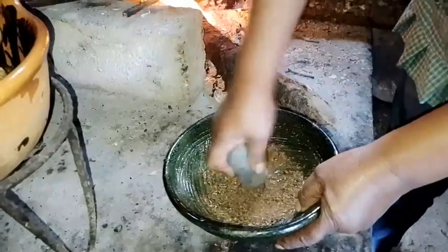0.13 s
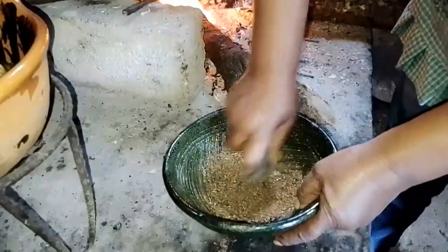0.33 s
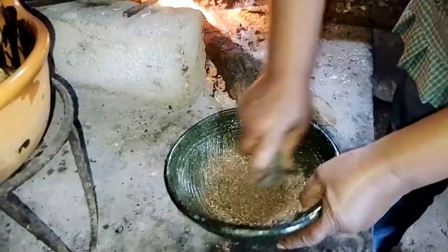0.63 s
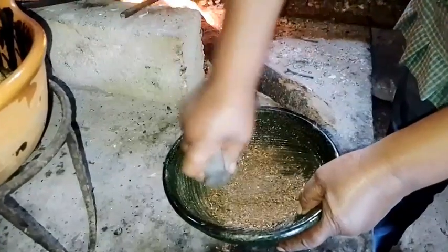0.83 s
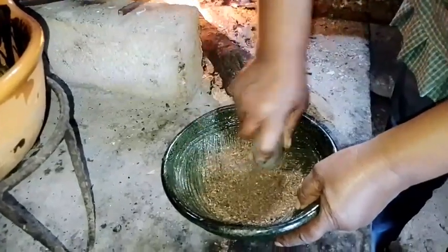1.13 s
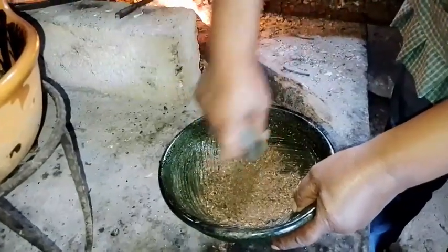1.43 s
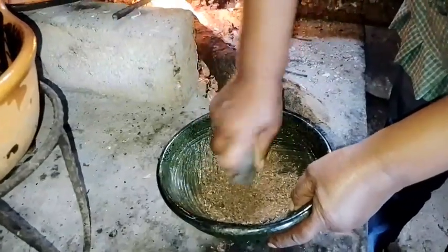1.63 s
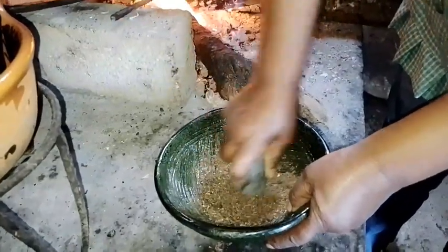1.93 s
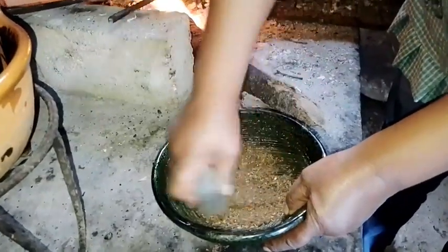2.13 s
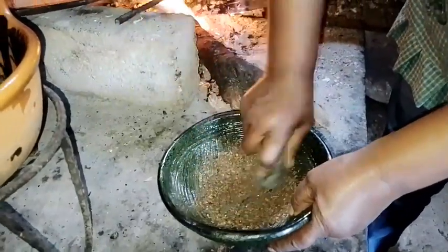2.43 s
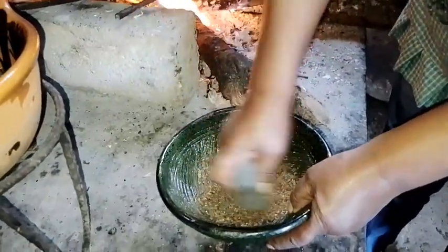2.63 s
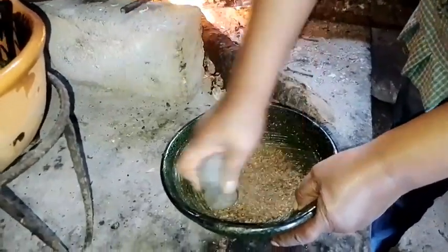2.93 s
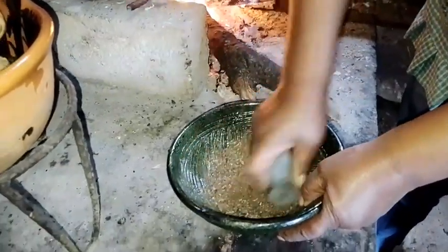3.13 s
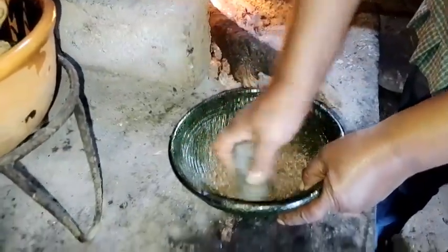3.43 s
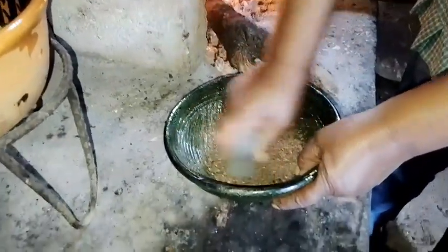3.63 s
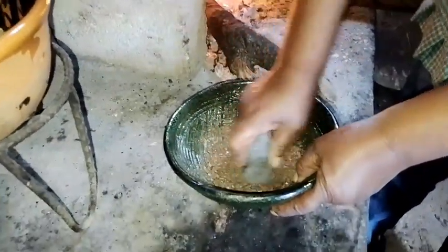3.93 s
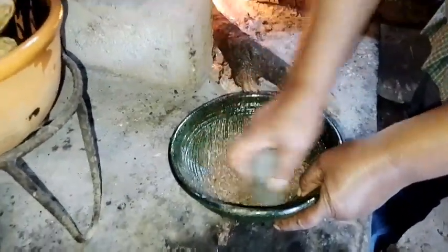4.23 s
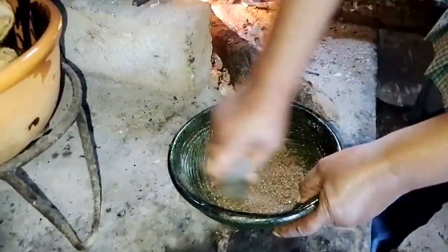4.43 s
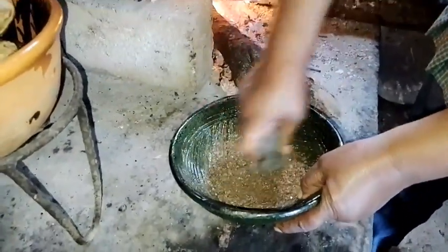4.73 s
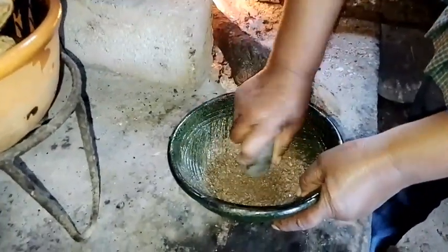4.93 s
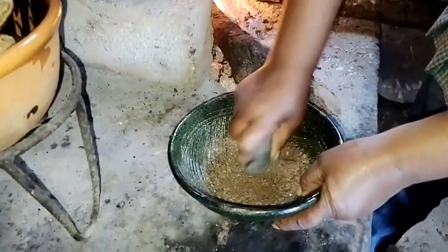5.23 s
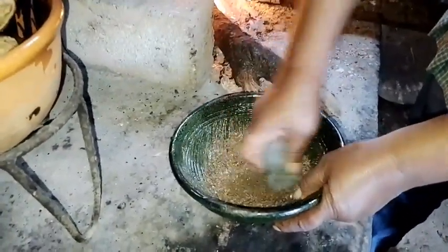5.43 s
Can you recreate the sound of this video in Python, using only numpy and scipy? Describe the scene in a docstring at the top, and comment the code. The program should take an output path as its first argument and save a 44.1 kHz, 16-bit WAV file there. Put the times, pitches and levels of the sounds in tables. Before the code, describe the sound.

A stone pestle grinds dry, gritty seasoning in a hand-held clay bowl with quick uneven scraping strokes, tiny seed cracks and occasional dull knocks.

```python
"""In a small kitchen, a stone pestle grinds dry seasoning in a hand-held clay bowl.
Seven or eight pushes a second shape a random stream of breaking grains: filtered noise that crunches
in the treble and excites the resonances of the bowl's body and wall. Seeds crack as short noise bursts
with a ping, and the pestle now and then knocks on the clay as a band-limited push with a skid.
Feedback delays give the kitchen's faint answer; shaped noise gives its very faint steady hush."""
import sys
import numpy as np
from scipy import signal
from scipy.fft import rfft, irfft
from scipy.io import wavfile
from scipy.ndimage import uniform_filter1d

SR = 44100
rng = np.random.default_rng(int(sys.argv[2]) if len(sys.argv) > 2 else 0)


def store_pcm(level_fs):
    """Save levels as 16-bit WAV."""
    pcm = np.round(np.clip(level_fs, -1, 1) * 32767).astype(np.int16)
    wavfile.write(sys.argv[1], SR, np.atleast_2d(pcm).T)


N = 246078  # length [samples]


def from_db(db):
    """Logarithmic level: decibels become an amplitude gain."""
    return 10 ** (np.asarray(db) / 20)


def rms_one(x):
    """Power normalization: scale a signal to unit mean square."""
    return x / np.sqrt(np.mean(x ** 2) + 1e-20)


def cut(x, hz, kind, order):
    """Causal filtering: a Butterworth response, maximally flat in its passband."""
    return signal.sosfilt(signal.butter(order, hz, kind, fs=SR, output="sos"), x)


def tilt(x, hz, low_db, high_db):
    """Zero-phase band splitting: separate gains below and above a frequency."""
    low = signal.sosfiltfilt(signal.butter(3, hz, fs=SR, output="sos"), x)
    return from_db(low_db) * low + from_db(high_db) * (x - low)


def die_away(x, seconds):
    """Exponential relaxation: every click leaves a tail of its own height."""
    return signal.lfilter([1], [1, -np.exp(-1 / (seconds * SR))], x + 1e-18)


def add(out, start_s, sound):
    """Linear superposition: mix a short sound in at its start time."""
    at = int(start_s * SR)
    out[..., at:at + sound.shape[-1]] += sound[..., :N - at]


def stereo_noise(alike):
    """Interchannel correlation: white noise whose power is partly shared by the two sides."""
    shared = rng.standard_normal(N)
    separate = rng.standard_normal((2, N))
    return np.sqrt(alike) * shared + np.sqrt(1 - alike) * separate


def drift(rate):
    """Low-pass random process: slow chance of unit spread, changing about rate times a second."""
    step = 40  # samples between computed points
    r = np.exp(-2 * np.pi * rate * step / SR)
    chance = rng.standard_normal(N // step + 2002)
    slow = signal.lfilter([1], [1, -2 * r, r * r], chance)[2000:]  # settled part
    return np.interp(np.arange(N) / step, np.arange(len(slow)), rms_one(slow))


def resonate(force, modes, low_hz, high_hz, wander_db, wander_rate):
    """Modal superposition: parallel resonances, each fed unevenly by the moving contact point."""
    # a unit impulse ahead of the force probes the power gain of the whole bank
    probe = signal.unit_impulse(N // 20) * np.ones((2, 1))
    out = 0
    for k, (hz, width_hz, *sides_db) in enumerate(modes):
        r = np.exp(-np.pi * width_hz / SR)
        poles = [1, -2 * r * np.cos(2 * np.pi * hz / SR), r * r]
        coupling = rms_one(from_db(wander_db * np.clip(drift(wander_rate), -2, 2)))
        driven = np.hstack([probe, force * coupling]) + 1e-18
        ringing = signal.lfilter([1, 0, -1], poles, driven)
        polarity = (-1) ** k
        out = out + polarity * (1 - r * r) * from_db(sides_db)[:, None] * ringing
    out = cut(out, low_hz, "high", order=4)
    out = cut(out, high_hz, "low", order=3)
    response, sound = out[:, :-N], out[:, -N:]
    return sound / np.sqrt(np.sum(response ** 2) / 2)  # about unit power gain


# spectrum of the kitchen's still air: (frequency [Hz], relative spectral density [dB per Hz])
AIR_SPECTRUM = [(20, -18), (60, -18.5), (150, -17.5), (400, -8), (900, -36), (2000, -26.5), (6000, -37),
                (14000, -26.5)]
AIR_DB = -78


def air():
    """Spectral shaping: weighted noise makes a very faint steady hush."""
    hz, db = np.transpose(AIR_SPECTRUM)
    bins_hz = np.fft.rfftfreq(N, 1 / SR)
    colour = from_db(np.interp(np.log(bins_hz + 1), np.log(hz), db))
    return from_db(AIR_DB) * rms_one(irfft(rfft(stereo_noise(alike=0.75)) * colour, N))


SWELL_POWER, SAG_DB_PER_S = 1.12, 27  # the hand leans in, then eases a little as the grains give way
RELEASE_DB_PER_S = 571  # it lets up quickly ...
COAST_DB, COAST_DB_PER_S = -9, 190  # ... while the pestle coasts on over the powder


def pressure(start_s, swell_s, hold_s):
    """Force envelope: one push from 0 to 1 swells, holds with a slight sag, lets up and coasts out."""
    t = np.arange(N) / SR - start_s
    swell_s = max(swell_s, 0.002)  # no push swells faster
    rise = np.clip(t / swell_s, 0, 1) ** SWELL_POWER
    sag = from_db(-SAG_DB_PER_S * np.clip(t - swell_s, 0, hold_s))
    after = np.maximum(t - swell_s - hold_s, 0)
    coast = from_db(COAST_DB)
    release = (1 - coast) * from_db(-RELEASE_DB_PER_S * after) + coast * from_db(-COAST_DB_PER_S * after)
    return rise * sag * release


UNEVEN_DB, UNEVEN_PER_S = 1.5, 31  # the bed of seasoning is lumpy

# pushes of the pestle, with relative levels: (start [s], swell [s], hold [s],
# crunch [dB], bowl rumble [dB], wall rasp [dB], depth of the rumble [dB, scaled on use],
# extra left-minus-right level of the crunch [dB], fine powder hiss [dB])
PUSHES = [(0.0, 0.0016, 0.044, -42, -51, -63.5, 9, -2.5, -1),
          (0.081, 0.079, 0.022, -35.5, -39.5, -46, -11, 2, -2),
          (0.292, 0.03, 0.038, -41, -51.5, -56, 2, -2.5, -3.5),
          (0.424, 0.027, 0.053, -38.5, -45.5, -50.5, -4.5, -0.5, -1.5),
          (0.511, 0.02, 0.17, -53, -62, -59.5, 16.5, 1, -12),
          (0.685, 0.04, 0.023, -34.5, -34.5, -37.5, -8.5, 0.5, -2),
          (0.745, 0.048, 0.028, -36, -45.5, -46, 3.5, -4, -1.5),
          (0.904, 0.13, 0.078, -46.5, -60.5, -62, 2, -2.5, -3),
          (1.013, 0.025, 0.006, -38, -40.0, -46.5, 1, -13, -2.5),
          (1.143, 0.043, 0.065, -49.5, -64.5, -55.5, 21.5, -5, 1.5),
          (1.302, 0.032, 0.06, -32.5, -39.0, -43.5, 6.5, -2, -2.0),
          (1.475, 0.09, 0.041, -41, -49.5, -58, 0.5, -1.5, 0.5),
          (1.685, 0.046, 0.025, -39.5, -43.5, -57.5, -12, -1, 3),
          (1.968, 0.014, 0.019, -48.5, -50, -62, 0, 0.5, 2.5),
          (2.019, 0.02, 0.004, -36.5, -42, -67, -3, -1, 2.5),
          (2.062, 0.014, 0.066, -45, -52.5, -63, -2, -1.5, -0.5),
          (2.196, 0.055, 0.08, -64, -77, -72, -12, -6, 1), (2.261, 0.052, 0.06, -40, -45, -57, -1, 2, -5),
          (2.413, 0.022, 0.092, -42, -49.5, -61.5, 5.5, -4.5, -3),
          (2.57, 0.031, 0.057, -42.5, -47.5, -60, -3.0, -1.5, 0),
          (2.685, 0.026, 0.073, -47.5, -53, -66, 2.5, -4, -2.5),
          (2.816, 0.028, 0.12, -45, -49, -66.5, 2, 0.5, 5.5),
          (2.993, 0.019, 0.074, -41.5, -44, -63, -4.5, -0.5, 2),
          (3.124, 0.093, 0.091, -43.5, -49.5, -64.5, 2.5, -5, -2.5),
          (3.307, 0.034, 0.0078, -43, -46.5, -53.5, -12, -6, 3),
          (3.387, 0.0062, 0.006, -36.5, -40.5, -49, 0, -0.5, 4.5),
          (3.433, 0.022, 0.002, -37, -35.5, -61, -2.5, -6, -3.5),
          (3.594, 0.021, 0.051, -42, -48.5, -65, 5.5, -0.5, -0.5),
          (3.705, 0.077, 0.0086, -36, -39, -65, -5, 1.5, 2),
          (3.86, 0.031, 0.047, -69.5, -66, -86, 0, -1, -1),
          (3.99, 0.03, 0.091, -43.5, -49.5, -65.5, 0.5, -2, -5),
          (4.096, 0.034, 0.021, -36.5, -36, -45.5, -13, 1, 6),
          (4.191, 0.019, 0.006, -38.5, -40.5, -50, -13.5, 2, 0.0),
          (4.306, 0.0056, 0.006, -50.0, -55, -70.0, 4, 2, 4.5),
          (4.357, 0.03, 0.11, -41, -45, -57, 4.5, 0, 4),
          (4.47, 0.0037, 0.017, -37, -53, -47.5, 15.5, 0.5, -5),
          (4.65, 0.088, 0.003, -44.5, -52.5, -65, -7, -5, -5.5),
          (4.768, 0.021, 0.042, -61, -71.5, -93, -25, -1, -3.5),
          (4.861, 0.014, 0.057, -48, -66.5, -70.5, -10, -5.5, -1.5),
          (4.989, 0.041, 0.044, -38, -47, -56.0, -1.5, -2, -3),
          (5.152, 0.099, 0.003, -41, -55, -67.5, 2.5, -2.0, -2.5),
          (5.331, 0.022, 0.05, -45.5, -45.5, -67.5, 9.5, -4, -4)]


def strokes():
    """Power addition: pushes sum to crunch, rumble and rasp; contact averages them by squared envelope."""
    rows = np.array(PUSHES)
    effort = np.array([pressure(*row[:3]) for row in PUSHES]) ** 2 + 1e-12
    power = from_db(rows[:, 3:6].T) ** 2 @ effort
    strengths = np.sqrt(power) * from_db(UNEVEN_DB * drift(UNEVEN_PER_S))
    contact = rows[:, 6:].T @ effort / effort.sum(axis=0)
    return strengths, contact


def grains(per_s, spread_db):
    """Random point process: energy set free by breaking grains, many small ones and a few large."""
    sizes = from_db(spread_db * np.minimum(rng.exponential(1, N), 4))
    return (rng.random(N) < per_s / SR) * sizes ** 2


def crumble(energy, seconds, smooth_share, even_s):
    """Energy envelope: crumbling grains over a smooth rub; the hand keeps the mean effort even."""
    bursts = die_away(energy, seconds)
    mean = uniform_filter1d(bursts, int(even_s * SR)) + 1e-9
    share = np.clip(smooth_share, 0, 1)
    return np.sqrt(np.maximum((1 - share) * bursts / mean + share, 0))


# resonances that colour the crunch:
# (frequency [Hz], width [Hz], relative left level [dB], relative right level [dB])
GRIT_MODES = [(3494, 150, -18.5, 0.5), (3529, 58.6, -28.5, 1.5), (3590, 41, -6, -1), (4134, 174, -31, 5),
              (4096, 176, -13.5, 0.5), (4201, 71, -42, -8), (4884, 260, -7.5, -15), (5427, 86, -7.5, -34),
              (5905, 244, -12, -25.5), (6270, 300, -15, -18.5), (7115, 314, -2.5, -14.5),
              (7393, 143, -2.5, -13), (8490, 760, -4.5, -21.5), (9845, 800, -61, -9.5),
              (10464, 1100, -56, -9), (11970, 1700, -48, -26.5)]


def crunch_treble(grit, fine_db):
    """Resonant filtering: modes colour the grit, after the powder hiss tilts its top."""
    return resonate(tilt(grit, 7700, 0, fine_db), GRIT_MODES,
                    low_hz=3035, high_hz=14400, wander_db=2.5, wander_rate=15.0)


# resonances of the bowl's body:
# (frequency [Hz], width [Hz], relative left level [dB], relative right level [dB])
BODY_MODES = [(233.3, 75, -20, -15), (281.6, 66, -16, -9.5), (380.4, 21.5, -7.5, -3.5),
              (506, 89, -17, -13.5), (594, 25.5, -8.5, -14.5), (706.5, 76, -3, -12.5), (815, 120, -10, -10),
              (893, 49, 0, 1.5), (916, 138, -4.5, -26.5)]


def bowl_body(force):
    """Forced vibration: contact force rings the low modes of the bowl."""
    return resonate(force, BODY_MODES, low_hz=226, high_hz=980, wander_db=3.0, wander_rate=16.8)


# resonances of the bowl's wall, woken by hard rubbing:
# (frequency [Hz], width [Hz], relative left level [dB], relative right level [dB])
WALL_MODES = [(1114, 58, 2, 3.5), (1400, 77, 0, -11), (1517, 86, -1.5, 0), (1693, 600, -9, -25.5),
              (2220, 41, -5.5, -4.5), (2625, 96, -1.5, -15.5)]


def bowl_wall(force):
    """Forced vibration: rasping force rings the middle modes of the clay wall."""
    return resonate(force, WALL_MODES, low_hz=1030, high_hz=2900, wander_db=4.5, wander_rate=6.7)


def shudder(force):
    """Compliant support: the held bowl gives a little, passing only the force's lowest band."""
    return from_db(-14.5) * cut(cut(force, 210, "low", order=2), 70, "high", order=1)


# seeds cracking: (time [s], relative level [dB], pitch [Hz], crumbling time [s])
SEED_CRACKS = [(0.0349, -36.5, 5530, 0.0018), (0.1072, -28, 4830, 0.0058), (0.1123, -39, 4520, 0.0028),
               (0.133, -32.5, 5020, 0.0084), (0.3804, -32.5, 4270, 0.0022), (0.43, -44, 10420.0, 0.0033),
               (0.6702, -36.5, 5050, 0.0023), (0.8056, -30.5, 7040, 0.0023), (0.8688, -38.5, 4370, 0.0026),
               (1.0012, -33, 4250, 0.0027), (1.0342, -27.5, 3960, 0.0075), (1.1955, -49.5, 4130, 0.0077),
               (1.2186, -31, 4270, 0.0046), (1.223, -40, 11200, 0.00087), (1.2439, -31.5, 4850, 0.0012),
               (1.2667, -28.5, 4300, 0.0014), (1.329, -37, 4170, 0.006), (1.4177, -37.5, 4030, 0.012),
               (1.975, -47, 4250, 0.0073), (2.0775, -38, 4030, 0.0077), (2.109, -33.5, 4070, 0.002),
               (2.288, -36, 10250, 0.0019), (2.309, -42, 5640, 0.0088), (2.4356, -40, 3880, 0.0032),
               (2.4614, -28, 5370, 0.0022), (2.6512, -32.5, 4100, 0.0013), (2.738, -28, 3630, 0.00068),
               (2.925, -43.5, 4570, 0.0022), (3.0143, -36, 10700, 0.005), (3.196, -33.5, 3700, 0.0025),
               (3.2607, -32.5, 7440, 0.003), (3.3346, -37, 5200, 0.0029), (3.4446, -33.5, 4930, 0.0041),
               (3.7337, -33, 4660, 0.00071), (3.763, -45, 4800, 0.0046), (3.7828, -43, 4920, 0.0059),
               (3.92, -53, 3470, 0.0033), (4.0736, -30.5, 4480, 0.0016), (4.197, -41, 7300, 0.022),
               (4.31, -61, 10400, 0.0036), (4.475, -31, 6840, 0.0057), (4.4965, -28.5, 4140, 0.0016),
               (4.7385, -39.5, 6870, 0.0012), (4.751, -44, 5700, 0.0018), (4.789, -47, 4070, 0.0017),
               (5.0429, -31, 6890, 0.0074), (5.0746, -37, 6600, 0.0019), (5.1322, -37.5, 5620, 0.0015),
               (5.169, -38.5, 9780, 0.0008), (5.207, -51, 4240, 0.0056)]


def cracks(rise_s, ping_width_hz):
    """Brittle fracture: seeds give way at once and crumble; returns envelope and pitched pings."""
    envelope, pings = np.zeros(N), np.zeros((2, N))
    t = np.arange(SR // 20) / SR
    for start_s, db, hz, crumble_s in SEED_CRACKS:
        burst = (1 - np.exp(-t / rise_s)) * np.exp(-t / crumble_s)
        burst = from_db(db) * burst / burst.max()
        band = [hz - ping_width_hz / 2, hz + ping_width_hz / 2]
        ping = cut(burst * rng.standard_normal((2, len(t))), band, "band", order=1)
        add(envelope, start_s, burst)
        add(pings, start_s, rms_one(ping) * np.sqrt(np.mean(burst ** 2)))
    return envelope, pings


# the pestle knocks on the clay: (time [s], relative level [dB], pitch [Hz], skid time [s])
CLAY_KNOCKS = [(0.1105, -32, 850, 0.023), (0.545, -34, 520, 0.014), (0.6705, -28, 940, 0.0082),
               (1.123, -36, 620, 0.0093), (1.2895, -47.5, 820, 0.01), (1.3255, -27.5, 1130, 0.03),
               (2.3606, -35.5, 500, 0.0086), (3.017, -47, 790, .008), (3.352, -36.5, 890, 0.0064),
               (3.453, -43, 587, 0.0081), (4.0742, -26, 775, 0.015), (4.117, -30, 830, 0.0073),
               (4.214, -45, 840, .009), (4.3855, -43, 656, 0.0051), (5.3635, -37.5, 477, 0.0067)]


def knocks(skid_db, spread):
    """Impact force: a push, lower in pitch the more powder cushions it, with a short noisy skid."""
    out = np.zeros(N)
    t = np.arange(SR // 10) / SR
    push = signal.unit_impulse(len(t))
    for start_s, db, hz, skid_s in CLAY_KNOCKS:
        band = [hz / (1 + spread), hz * (1 + spread)]
        skid = from_db(skid_db) * rng.standard_normal(len(t)) * np.exp(-t / skid_s)
        push_peak = np.abs(cut(push, band, "band", order=2)).max()
        add(out, start_s, from_db(db) * cut(push + skid, band, "band", order=2) / push_peak)
    return out


def grinding():
    """Source and resonator: one stream of breaking grains drives the body, the wall and the crunch."""
    (crunch, rumble, rasp), (depth_db, pan_db, fine_db) = strokes()
    gliding = 1 / (1 + crunch / from_db(-65.5))  # a light hand slides smoothly over the powder
    broken = grains(per_s=700, spread_db=3.5)
    sharp = crumble(broken, seconds=0.0012, smooth_share=gliding + 0.27, even_s=0.058)
    heavy = crumble(broken, seconds=0.0034, smooth_share=gliding, even_s=0.0099)
    seed, pings = cracks(rise_s=0.00028, ping_width_hz=97)
    knock = knocks(skid_db=-27, spread=0.56)

    # a deeper contact trades the bowl's upper modes for its lower ones
    rub = tilt(rumble * heavy * stereo_noise(alike=0.85), 554, 0.69 * depth_db, -0.3 * depth_db)
    seed_thump = from_db(-13.0) * seed * stereo_noise(alike=1.0)
    body_force = from_db(-1.0) * rub + seed_thump + from_db(-4) * knock

    wall_rub = from_db(-2.7) * rasp * heavy + from_db(-37) * seed
    wall_force = wall_rub * stereo_noise(alike=0.38) + from_db(-14) * knock

    grit = (from_db(1.0) * crunch * sharp + from_db(0.5) * seed) * stereo_noise(alike=0.28)
    side_pings = from_db([[-6], [-1]]) * cut(pings, 3800, "high", order=4)
    treble = crunch_treble(grit, fine_db) + side_pings
    panned_treble = treble * from_db(np.outer([0.7, -0.3], pan_db))

    direct_knock = from_db([[2.5], [0.5]]) * knock  # the blow itself is heard before the bowl rings
    return panned_treble + bowl_body(body_force) + bowl_wall(wall_force) + direct_knock + shudder(body_force)


KITCHEN_T60_S, KITCHEN_DB = 0.15, -10  # time to decay by 60 dB; level of the reverberation


def kitchen(x, order=16):
    """Reverberation by recirculation: feedback delays, half of them on each side."""
    out = np.zeros((2, N))
    lags = (rng.uniform(0.0081, 0.043, order) * SR).astype(int)
    for k, lag in enumerate(lags):
        side, polarity = k % 2, (-1) ** (k // 2)
        loop = x[side].copy()
        gain = from_db(-60 * lag / SR / KITCHEN_T60_S)
        for i in range(lag, N, lag):
            loop[i:i + lag] += gain * loop[i - lag:i][:N - i]
        out[side] += (loop - x[side]) * polarity  # echoes only
    return out / np.sqrt(order / 2)


def scene():
    """Direct and reverberant field: the bowl close by, the room behind it."""
    bowl = grinding()
    return bowl + from_db(KITCHEN_DB) * kitchen(bowl) + air()


LEFT_TOP_HZ, RIGHT_TOP_HZ, CUTOFF_HZ = 6940, 12660, 14400
TOP_ORDERS = (10, 36)  # left, right


def record(dry):
    """Band limitation: each microphone falls off above its own top, then both are cut steeply."""
    sides = []
    for side, top_hz, order, leak_db in zip(dry, (LEFT_TOP_HZ, RIGHT_TOP_HZ), TOP_ORDERS, (-23, -20)):
        kept = signal.sosfiltfilt(signal.butter(order, top_hz, fs=SR, output="sos"), side)
        sides.append(kept + from_db(leak_db) * (side - kept))
    steep = signal.ellip(10, 0.2, 70, CUTOFF_HZ, fs=SR, output="sos")
    return signal.sosfilt(steep, np.array(sides))


dry = scene()
out = record(dry)
store_pcm(out)
```